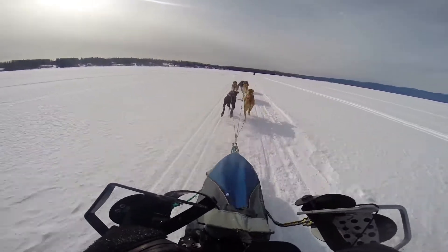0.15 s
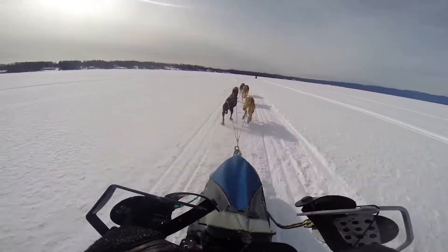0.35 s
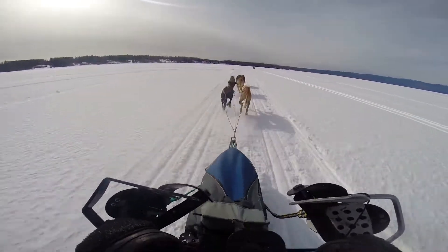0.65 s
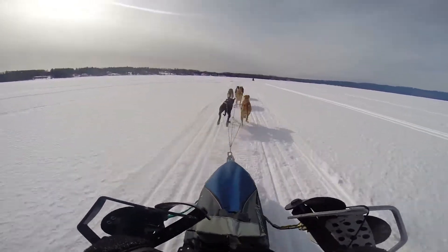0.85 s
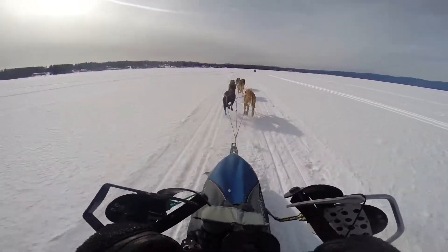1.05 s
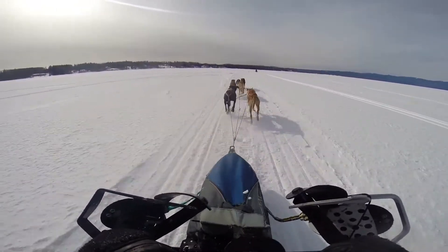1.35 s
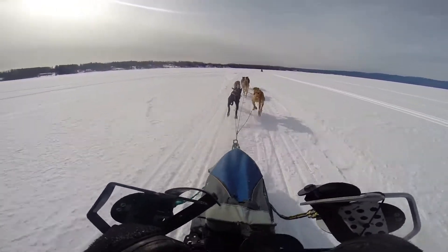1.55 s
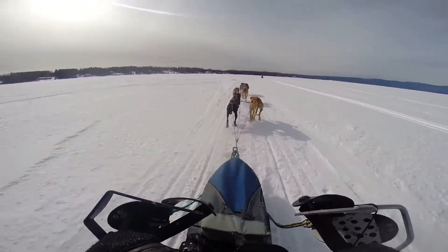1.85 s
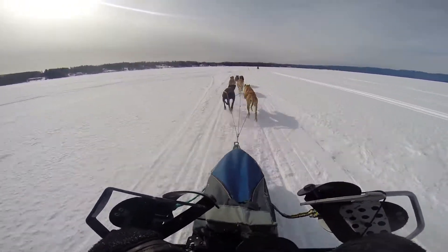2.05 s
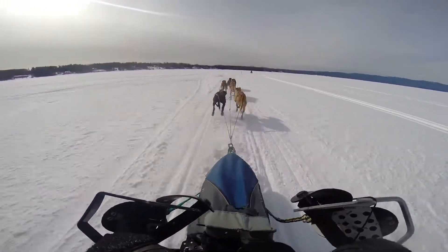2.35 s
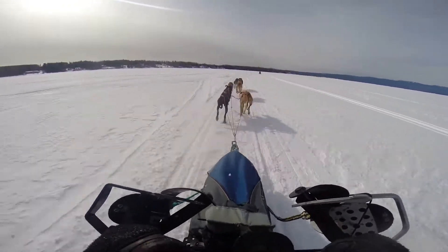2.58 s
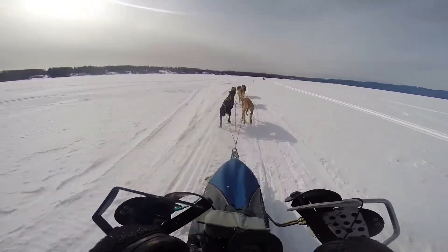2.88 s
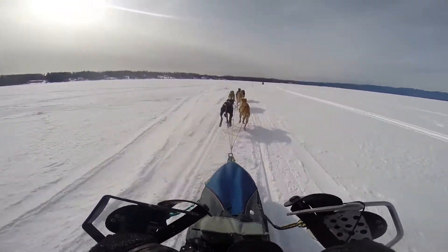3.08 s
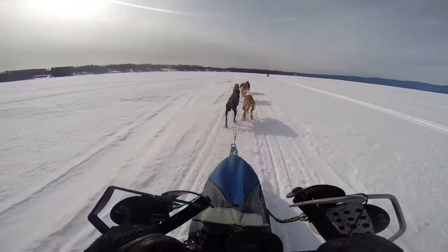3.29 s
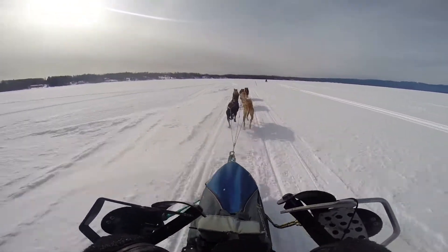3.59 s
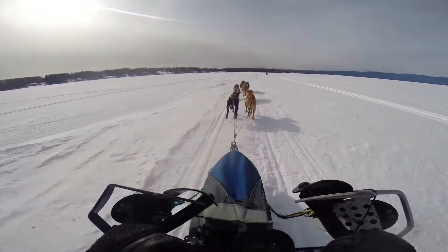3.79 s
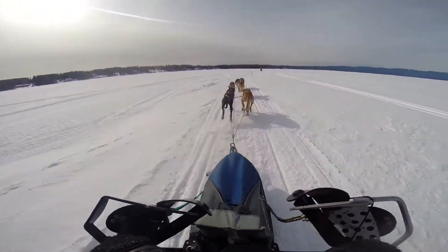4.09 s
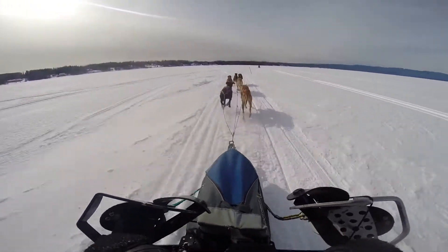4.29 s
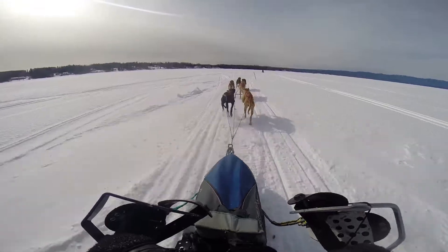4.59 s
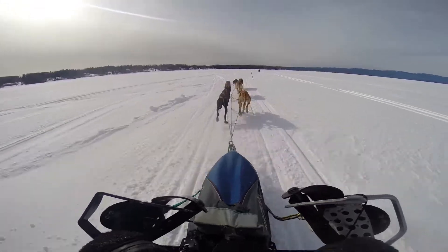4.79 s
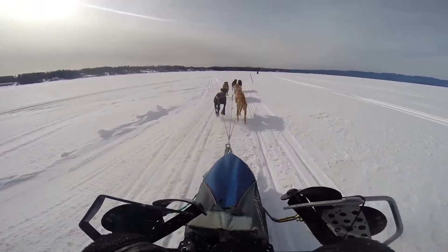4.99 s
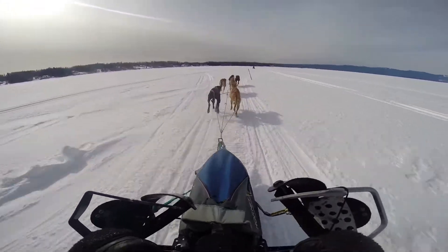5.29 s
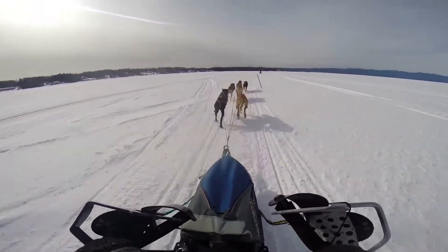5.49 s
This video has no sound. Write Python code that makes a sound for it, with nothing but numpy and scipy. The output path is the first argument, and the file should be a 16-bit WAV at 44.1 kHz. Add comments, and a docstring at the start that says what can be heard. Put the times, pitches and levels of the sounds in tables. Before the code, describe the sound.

Close, boxy onboard sound of runners scraping across snow in the open. The hiss is continuous and mid-heavy, gently rising and falling, with muffled rumble below. Dry frame clacks and crisp ice-grain ticks come irregularly: a quick early group, a loud double rattle around one and a half seconds, a sparse middle, then several lighter knocks around five seconds. The dogs are not heard.

```python
"""On packed snow a dog sled glides by; the listening point is a camera in a closed plastic housing on it.
The runners hiss: random grain forces drive the housing's resonances. Thrown ice grains tick on it
and frame knocks sound through the mount, both as short contacts that ring the modes.
Wind and bumps rumble as coloured noise below, and a thin steady whine is a sum of sines.
A gain control ducks after loud moments, then recovers."""
import sys
import numpy as np
from scipy import signal
from scipy.fft import rfft, irfft
from scipy.io import wavfile
from scipy.ndimage import uniform_filter1d, minimum_filter1d

SR = 44100
rng = np.random.default_rng(int(sys.argv[2]) if len(sys.argv) > 2 else 0)


def pcm_store(signal):
    """Save signal as 16-bit PCM."""
    levels = np.round(np.clip(np.atleast_2d(signal), -1, 1) * 32767)
    wavfile.write(sys.argv[1], SR, levels.astype(np.int16).T)


N = 248724

# Thin steady whine, likely the camera's electronics: f/Hz, level/dB
WHINE_TONES = [(8790, -83), (11720, -80), (14650, -95)]
# Course of wind and bumps: t/s, level/dB
RUMBLE_LEVEL = [(0.0, -36), (0.77, -36.5), (1.25, -38), (1.68, -36.5), (1.95, -38.5), (2.8, -37),
                (4.6, -38), (5.64, -34.5)]
# Relative spectrum of the rumble: f/Hz, level/dB per Hz
RUMBLE_SPECTRUM = [(12, -26), (20, 0.5), (43, 2), (56, -5), (70, -10), (102, -7.5), (304, -18), (500, -20),
                   (650, -26), (1100, -120)]
# Frame knocks: t/s, level/dB, centre f/Hz, reach/octaves, contact decay/ms
FRAME_KNOCKS = [(0.0232, -26, 2530, 0.65, 0.92), (0.314, -21, 2400, 0.32, 0.58),
                (0.3868, -14.5, 2500, 0.82, 1.3), (.398, -15, 2070, 0.46, 0.61),
                (.486, -17, 1600, 0.3, 1.2), (1.0373, -14, 2600, 0.36, 0.56),
                (1.298, -11.5, 764, 1.06, 1.3), (1.4393, -7, 2400, 0.75, 1.7),
                (1.4466, -16, 1020, 1.37, 0.84), (1.4521, -10.5, 1500, 1.3, 2.6),
                (1.5203, -8, 1250, 1.05, 3.1), (1.855, -23, 2820, 0.68, 1.3),
                (1.8852, -18.5, 2530, 0.46, 0.51), (3.669, -24.5, 1010, 0.21, 1.4),
                (4.053, -23.5, 4030, 0.33, 0.36), (2.644, -27, 3600, 0.53, 0.52),
                (3.816, -18, 2370, 0.34, 1.5), (4.7709, -16.5, 3040, 1.08, 0.3),
                (5.085, -23.5, 2300, 0.52, 0.55), (5.154, -13, 1760, 0.47, 0.68),
                (5.25, -22, 1620, 0.22, 1.5)]
# Louder ice grains on the housing: t/s, level/dB in the middle modes, level/dB in the top modes
ICE_GRAINS = [(0.0204, -39, -42), (0.024, -25.5, -33), (0.027, -55, -38), (0.053, -37, -36),
              (0.1003, -43, -37), (0.1468, -42, -38), (0.151, -38, -33), (0.3146, -23.5, -15),
              (0.3652, -41, -32), (0.387, -17, -25), (0.398, -25, -14), (0.4034, -47, -35),
              (0.4227, -37, -31), (0.4361, -33, -32), (0.479, -32, -34), (0.4877, -38, -36),
              (0.573, -38, -42), (0.5816, -40, -32), (0.6904, -48, -37), (0.712, -40, -43),
              (0.95, -35, -40), (1.441, -25, -47), (1.4469, -8, -1.5), (1.488, -61, -40),
              (1.7508, -34, -26.5), (1.7568, -37, -37), (1.8534, -25, -26), (1.8815, -43, -32),
              (1.8852, -19.5, -10), (1.9687, -42, -41), (2.0349, -43, -30), (2.2855, -39, -30),
              (2.5963, -40, -42), (2.6186, -34, -31), (2.642, -24.5, -29.5), (2.6607, -46, -38),
              (2.666, -43, -39), (2.6694, -40, -41), (2.877, -40.5, -36), (2.914, -32, -37),
              (2.9685, -43, -36), (2.9775, -39, -44), (3.048, -36, -34), (3.2328, -46, -39),
              (3.2813, -40, -40), (3.3458, -44, -41), (3.3593, -39, -45), (3.3903, -35, -28.5),
              (3.6311, -41, -38), (3.6685, -32, -32), (3.8164, -29.5, -24), (3.915, -37.5, -28),
              (4.052, -39, -31.5), (4.265, -43, -45), (4.771, -24, -23), (4.9835, -50, -41),
              (5.0647, -41, -48), (5.079, -38, -41), (5.0846, -31, -28), (5.0972, -28, -23.5),
              (5.1537, -35.5, -33), (5.167, -43, -43)]
# Housing modes: f/Hz, width/Hz and relative level/dB under the hiss, width/Hz and relative level/dB when struck
HOUSING_MODES = [(257, 220, -25.5, 150, 4), (422, 100, -31, 410, -8), (556.4, 75, -7, 210, 1.5),
                 (671, 110, -8.5, 310, -0.5), (907, 260, -10, 137, 2), (1040, 150, -33, 177, 0.5),
                 (1578, 288, 0.5, 260, 5), (1976, 450, -5, 860, 7), (2454, 327, -0.5, 324, 10.5),
                 (2733, 385, -3, 680, 10), (3440, 346, -9, 900, 12), (3693, 230, -13.5, 300, -21),
                 (4400, 850, -27, 300, 1), (5100, 180, -24, 200, -2.5), (5676, 620, -25, 218, 3.5),
                 (6410, 810, -28.5, 920, 6.5), (8380, 2400, -39.5, 1300, -1),
                 (10090, 2100, -40.5, 420, 0.5), (11060, 550, -42, 510, -3), (12350, 1700, -51.5, 1050, 1),
                 (14600, 900, -48, 1000, -2)]
# Course of the runner hiss in the glide, before its narrow bands are cut: t/s, level/dB
GLIDE_LEVEL = [(0.0, -31), (0.25, -31), (0.42, -26.5), (0.75, -29.5), (0.92, -27.5), (1.12, -30.5),
               (1.27, -30), (1.38, -32.5), (1.55, -29.5), (2.05, -34), (2.5, -31), (3.0, -29.5),
               (3.62, -28.5), (4.0, -33.5), (4.13, -30), (4.4, -34), (4.62, -34), (4.9, -30.5),
               (5.64, -28.5)]
# Narrow bands the hiss lacks: f/Hz, width/Hz, share removed (0-1)
HISS_DIPS = [(723, 430, 0.49), (1150, 210, 0.33), (3110, 230, 0.8), (4300, 83, .6)]

MIDDLE_HZ, TOP_HZ = 4200, 8000  # lower edges of the middle and top modes
CUTOFF_HZ = 16300  # stopband edge of the final steep cut
SPRAY_DB, SPRAY_FOLLOWS = 2, -0.2  # fine spray at mean hiss level, dB; change in dB per dB of hiss
FLURRY_S, CALM_SHARE = 0.084, 0.3  # flurry window around loud grains, s; share of the base rate between them
STRAY_MIDDLE_DB = -7  # stray grains in the middle modes against the top modes


def from_db(db):
    """Logarithmic level: decibels to amplitude gain."""
    return 10 ** (np.asarray(db) / 20)


def rms_one(x):
    """Normalisation: scale to unit root mean square."""
    return x / np.sqrt(np.mean(x ** 2) + 1e-20)


def in_time(rows):
    """Linear interpolation: each column of a curve, sample by sample."""
    s, *columns = np.transpose(rows)
    t = np.arange(N) / SR
    return [np.interp(t, s, column) for column in columns]


def drift(rate_hz):
    """Low-passed noise: slow chance of unit spread through two equal poles, computed at SR / 20."""
    pole = np.exp(-2 * np.pi * rate_hz * 20 / SR)
    noise = rng.standard_normal(N // 20 + 2002)
    slow = signal.lfilter([1], [1, -2 * pole, pole * pole], noise)[2000:]  # drop the settling
    return np.interp(np.arange(N) / 20, np.arange(len(slow)), rms_one(slow))


def resonate(x, hz, width_hz):
    """Damped resonance: a two-pole mode with about unit gain at its peak."""
    r = np.exp(-np.pi * width_hz / SR)
    feed = [(1 - r * r) / 2, 0, (r * r - 1) / 2]
    feedback = [1, -2 * r * np.cos(2 * np.pi * hz / SR), r * r]
    return signal.lfilter(feed, feedback, x + 1e-18)


def contact(length_ms, rattle, chance, hz):
    """Impulsive contact: one push and a dying random rattle, scaled largely by its strength at the mode."""
    steps = np.arange(len(chance))
    push = rattle * chance * np.exp(-steps / (max(length_ms, 0.05) * SR / 1000))
    push[0] = 1
    strength = abs(np.sum(push * np.exp(-2j * np.pi * hz * steps / SR)))
    return push / np.sqrt(0.7 * strength ** 2 + 0.3 * np.sum(push ** 2))


def strike(force, hz, width_hz, rise_hz):
    """Impulse response of a mode: it swells through a wider resonance, then rings by its own damping."""
    swelling = resonate(force, hz, width_hz + rise_hz)
    height = SR / (2 * np.pi * width_hz)  # evens out peak height whatever the damping
    return resonate(swelling, hz, width_hz) * height


def whine():
    """Superposition: faint steady sine tones."""
    t = np.arange(N) / SR
    return sum(np.sqrt(2) * from_db(level_db) * np.sin(2 * np.pi * hz * t) for hz, level_db in WHINE_TONES)


def rumble(lumpy_db):
    """Spectral shaping: wind on the housing and bumps under the runners as low, lumpy noise."""
    hz = np.fft.rfftfreq(N, 1 / SR)[1:]
    colour_hz, colour_db = np.transpose(RUMBLE_SPECTRUM)
    colour = np.interp(np.log(hz), np.log(colour_hz), colour_db)
    spectrum = rfft(rng.standard_normal(N)) * np.append(0, from_db(colour))
    lumpy = irfft(spectrum, N) * from_db(lumpy_db * drift(17.6))
    level_db, = in_time(RUMBLE_LEVEL)
    return from_db(level_db) * rms_one(lumpy)


def frame_knocks(rattle):
    """Selective modal excitation: softer blows through the mount ring the modes near their centre."""
    out = np.zeros(N)
    chance = rng.standard_normal((len(FRAME_KNOCKS), 256))
    for k, (hz, _, _, width_hz, struck_db) in enumerate(HOUSING_MODES):
        if hz >= MIDDLE_HZ:
            continue
        force = np.zeros(N)
        for (s, level_db, centre_hz, octaves, length_ms), c in zip(FRAME_KNOCKS, chance):
            at = round(s * SR)
            reach = np.exp(-0.5 * (np.log2(hz / centre_hz) / octaves) ** 2)
            force[at:at + 256] += from_db(level_db) * reach * contact(length_ms, rattle, c, hz)
        ring = strike(force, hz, width_hz, rise_hz=0.72 * hz)
        out += (-1) ** k * from_db(struck_db - 0.5) * ring  # neighbouring modes have opposite sign
    return out


def stray_grains(starts, base_per_s, floor_db):
    """Clustered random arrivals: faint grains fly in flurries around the loud ones."""
    loud = np.bincount(starts, minlength=N).astype(float)
    flurry = uniform_filter1d(loud, size=round(FLURRY_S * SR))
    born = rng.random(N) < base_per_s * (CALM_SHARE + flurry / flurry.mean()) / SR
    sign = rng.choice([-1, 1], N)
    level_db = floor_db + 3.1 * np.minimum(rng.exponential(1, N), 3)
    return born * sign * from_db(level_db)


def ice_ticks(length_ms, rattle, stray_base_per_s, stray_floor_db):
    """Hard-contact excitation: tiny ice grains, loud and stray, ring only the upper modes."""
    rows, out = np.array(ICE_GRAINS), np.zeros(N)
    starts = np.round(rows[:, 0] * SR).astype(int)
    chance = rng.standard_normal((len(rows), 128))
    spot_db = 2 * rng.standard_normal((len(rows), len(HOUSING_MODES)))  # where a grain lands favours some modes
    stray = stray_grains(starts, stray_base_per_s, stray_floor_db)
    for k, (hz, _, _, width_hz, struck_db) in enumerate(HOUSING_MODES):
        if hz <= MIDDLE_HZ:
            continue
        stray_gain = from_db(STRAY_MIDDLE_DB * (hz < TOP_HZ))
        force = np.concatenate([stray * stray_gain, np.zeros(128)])
        for at, (_, middle_db, top_db), c, own_db in zip(starts, rows, chance, spot_db[:, k]):
            level_db = own_db + (top_db if hz > TOP_HZ else middle_db)
            force[at:at + 128] += from_db(level_db) * contact(length_ms, rattle, c, hz)
        ring = strike(force[:N], hz, width_hz, rise_hz=3000)
        out += (-1) ** k * from_db(struck_db + 1.0) * ring
    return out


def runners(hiss_db, spray_db, grains_per_s, patchy_db):
    """Random modal excitation: dense crushed crystals drive every mode, wavering partly alone, partly together."""
    together, out = drift(6.5), 0
    grain_sizes = (rng.random(N) < grains_per_s / SR) * rng.exponential(1, N)
    crushing = rms_one(grain_sizes) + 1.84  # grains over a steady bed
    for hz, width_hz, level_db, _, _ in HOUSING_MODES:
        bright_db = spray_db * (hz > MIDDLE_HZ)
        waver_db = patchy_db * (1.63 * together + drift(13.0))
        force = crushing * rng.standard_normal(N)  # the same grains reach each mode by another path
        ring = resonate(resonate(force, hz, 2.33 * width_hz), hz, width_hz)
        out = out + from_db(level_db + bright_db + waver_db) * ring
    return from_db(hiss_db) * rms_one(out)


def scene():
    """Linear superposition: all sources reach one microphone inside the housing."""
    hiss_db, = in_time(GLIDE_LEVEL)
    spray_db = SPRAY_DB + SPRAY_FOLLOWS * (hiss_db - hiss_db.mean())
    hiss = runners(hiss_db, spray_db, grains_per_s=4000, patchy_db=0.56)
    for hz, width_hz, share in HISS_DIPS:
        hiss = hiss - share * resonate(hiss, hz, width_hz)
    ticks = ice_ticks(length_ms=0.4, rattle=0.35, stray_base_per_s=60, stray_floor_db=-57.5)
    knocks = frame_knocks(rattle=0.13)
    return (whine() + rumble(lumpy_db=1.5) + knocks + ticks + hiss)[None]


def gain_control(x, threshold_db, share, hold_s, release_db_per_s):
    """Level compression: excess over the threshold lowers the gain just after; it holds, then recovers."""
    t, window, hold = np.arange(N) / SR, round(0.015 * SR), round(hold_s * SR)
    power = signal.lfilter(np.ones(window) / window, [1], x ** 2)
    over_db = np.maximum(10 * np.log10(power + 1e-12) - threshold_db, 0)
    held_db = -minimum_filter1d(-over_db, hold, origin=(hold - 1) // 2)  # largest recent excess
    fall_db = release_db_per_s * t  # release of the excess, before share scales it
    released_db = np.maximum.accumulate(held_db + fall_db) - fall_db
    smooth_db = signal.lfilter([0.002], [1, -0.998], released_db)
    return x * from_db(-share * smooth_db)


def record(dry):
    """Nonlinear transmission: gain control, a microphone that fades at the top, rounded peaks, steep cut."""
    x = gain_control(dry[0], threshold_db=-18.5, share=0.92, hold_s=0.2, release_db_per_s=42)
    x = signal.sosfilt(signal.butter(6, 15000, fs=SR, output="sos"), x)
    rounded = 1.08 * np.tanh(x / 1.127)
    steep_cut = signal.cheby2(14, 90, CUTOFF_HZ, fs=SR, output="sos")
    return signal.sosfilt(steep_cut, rounded)[None]


dry = scene()
out = record(dry)
pcm_store(out)
```